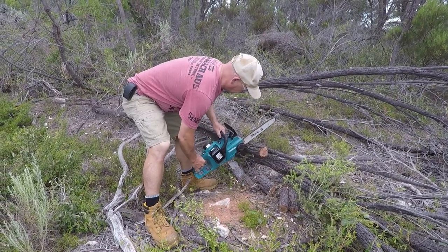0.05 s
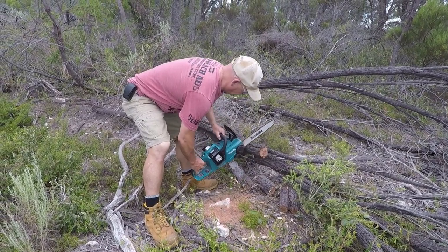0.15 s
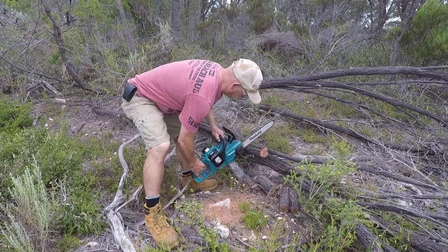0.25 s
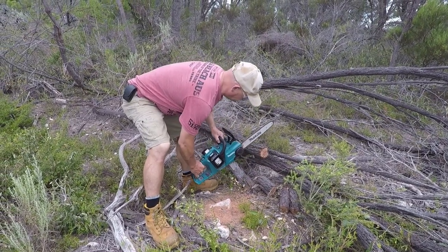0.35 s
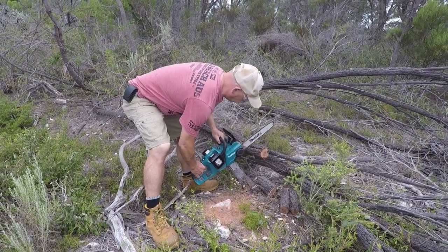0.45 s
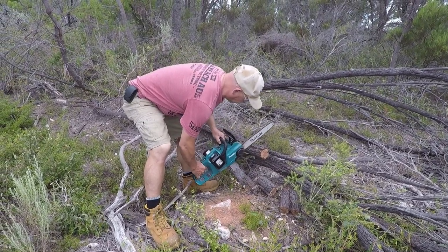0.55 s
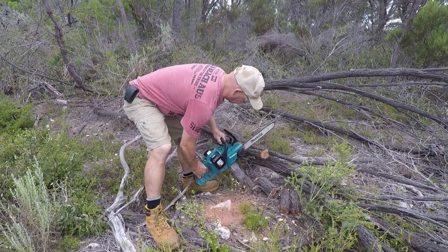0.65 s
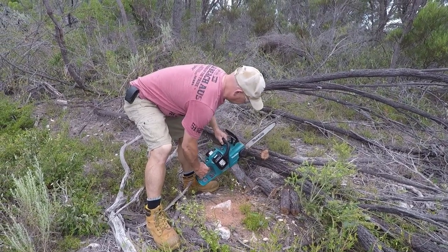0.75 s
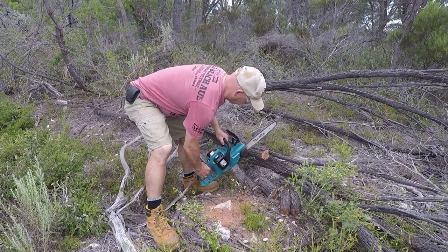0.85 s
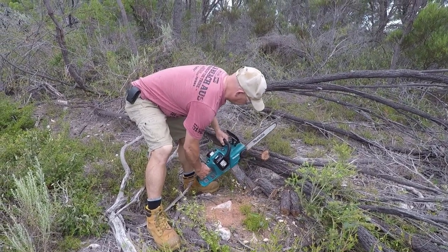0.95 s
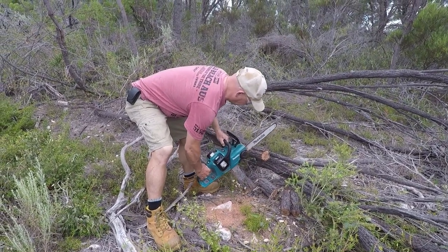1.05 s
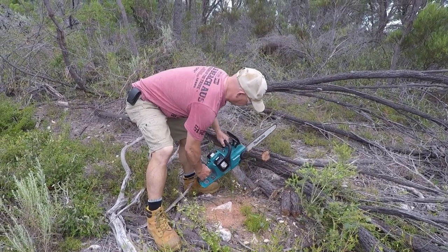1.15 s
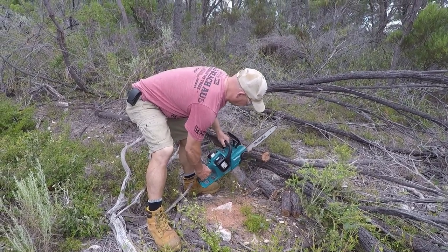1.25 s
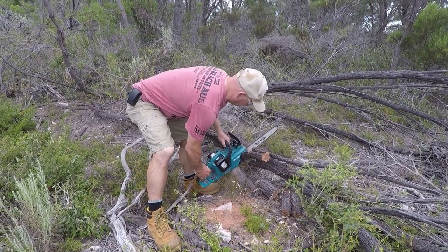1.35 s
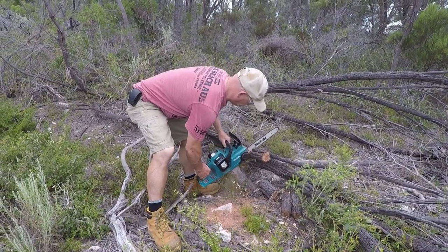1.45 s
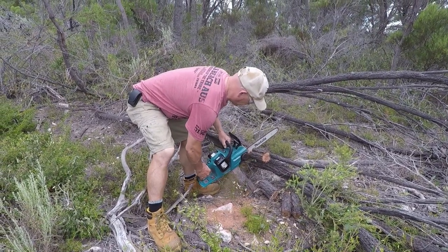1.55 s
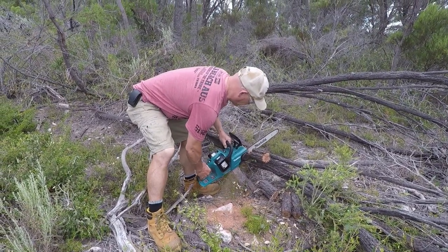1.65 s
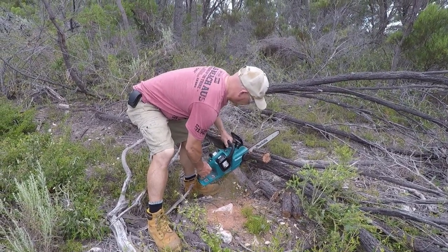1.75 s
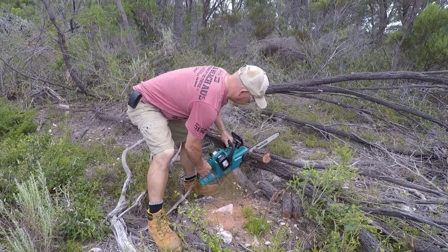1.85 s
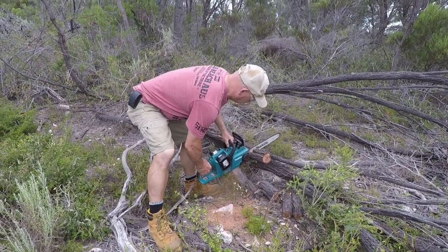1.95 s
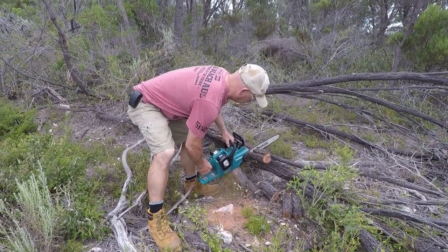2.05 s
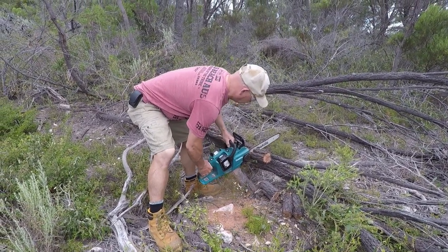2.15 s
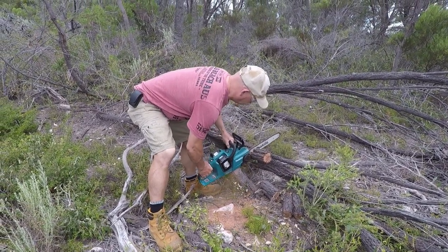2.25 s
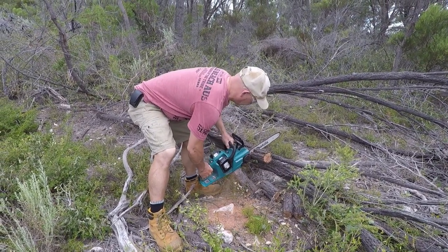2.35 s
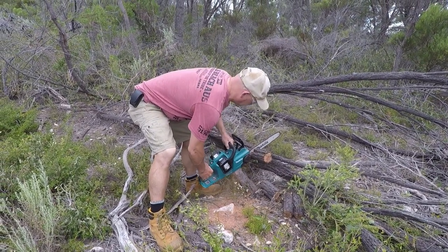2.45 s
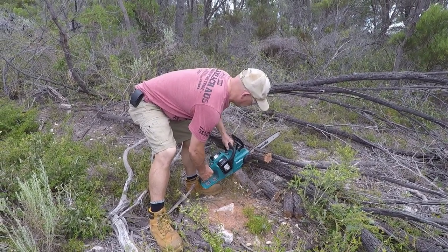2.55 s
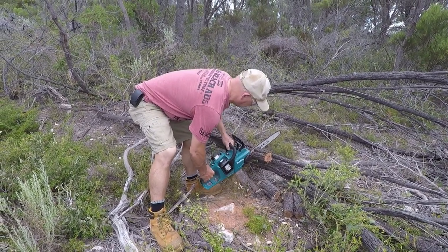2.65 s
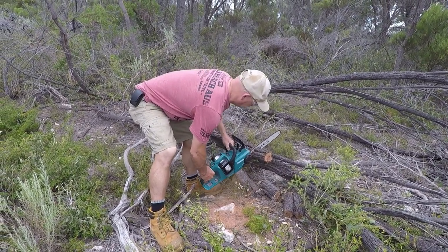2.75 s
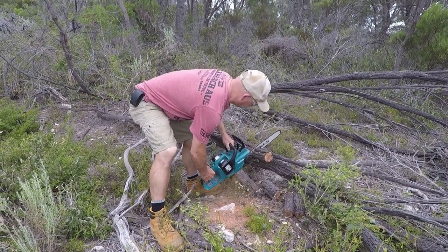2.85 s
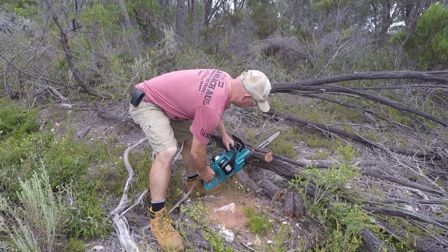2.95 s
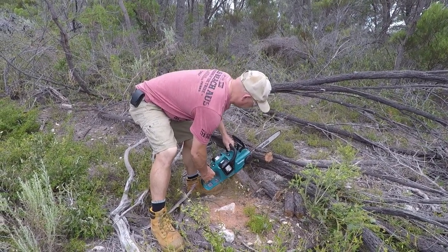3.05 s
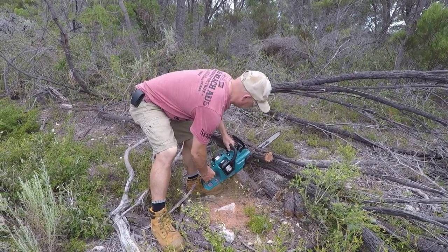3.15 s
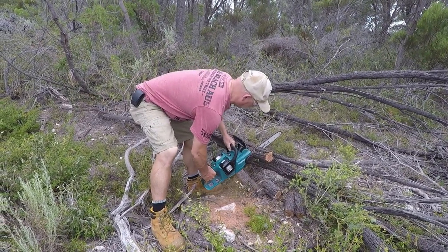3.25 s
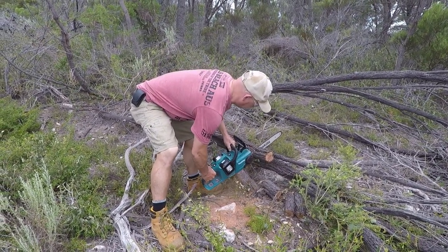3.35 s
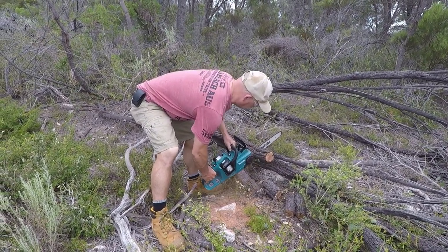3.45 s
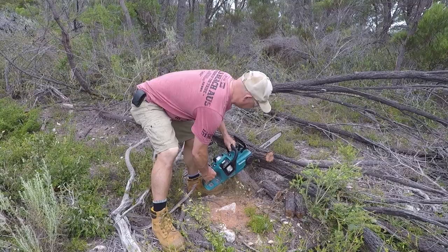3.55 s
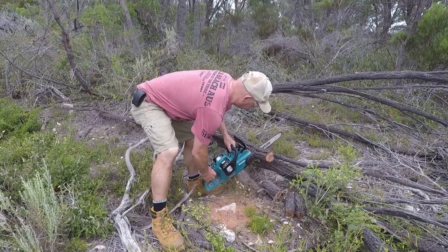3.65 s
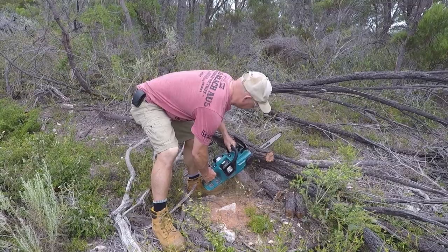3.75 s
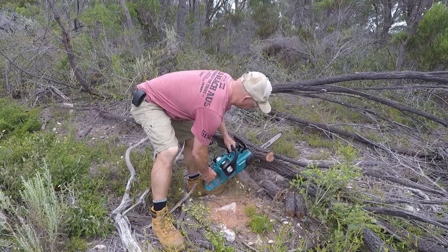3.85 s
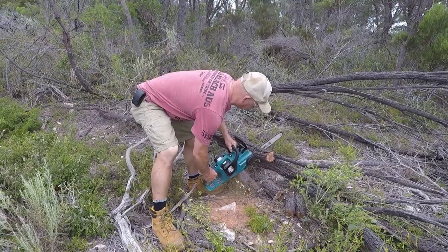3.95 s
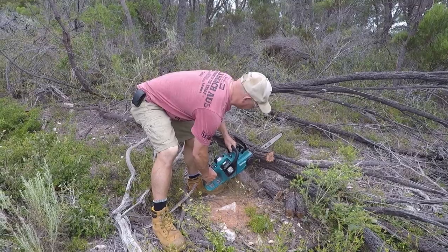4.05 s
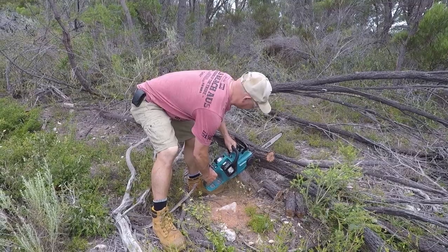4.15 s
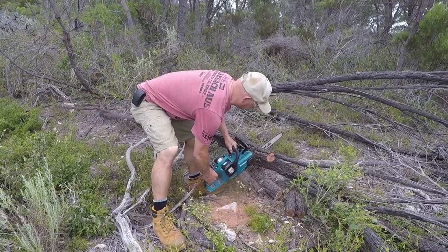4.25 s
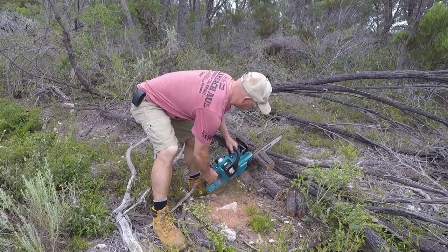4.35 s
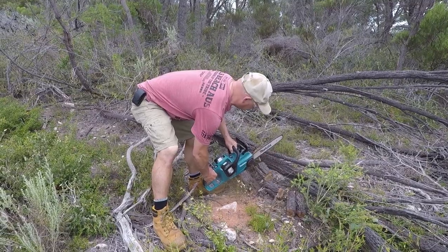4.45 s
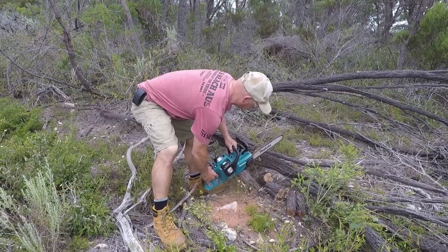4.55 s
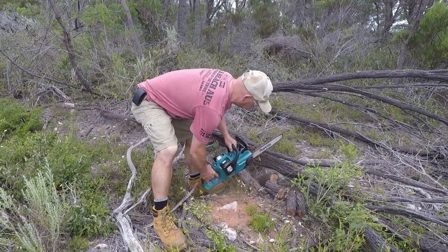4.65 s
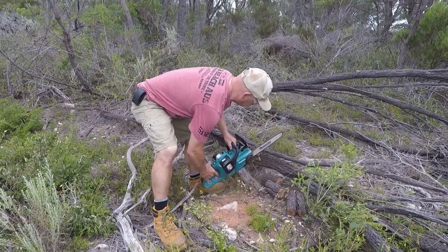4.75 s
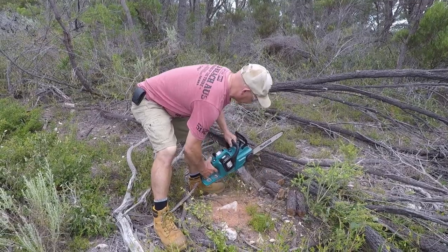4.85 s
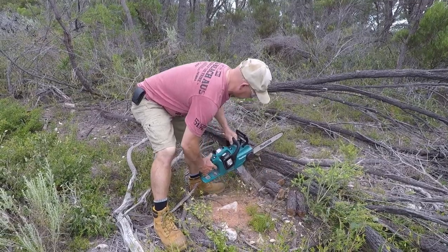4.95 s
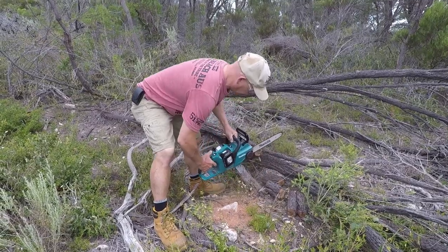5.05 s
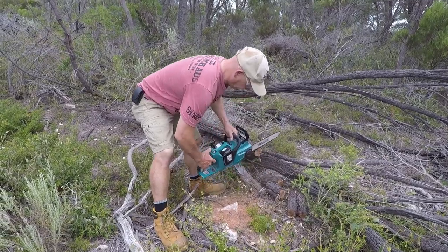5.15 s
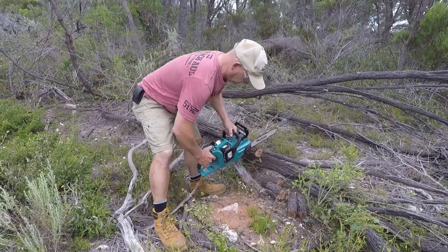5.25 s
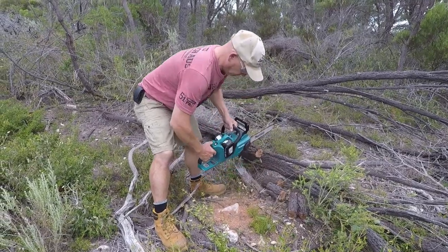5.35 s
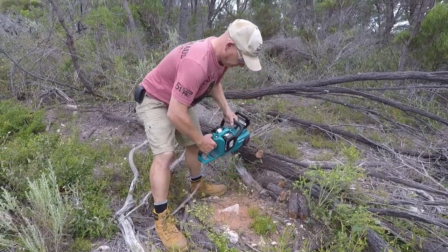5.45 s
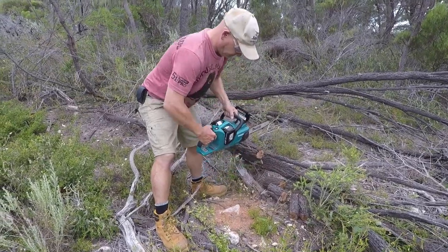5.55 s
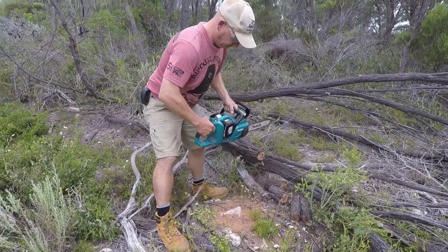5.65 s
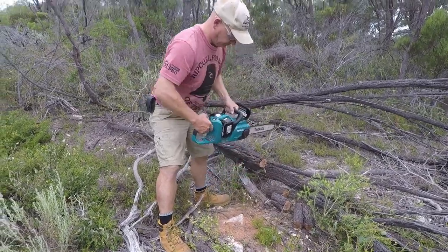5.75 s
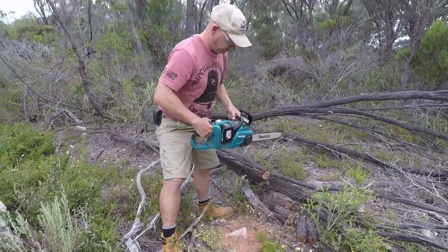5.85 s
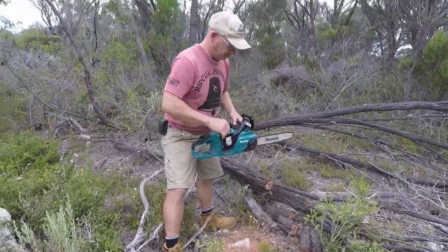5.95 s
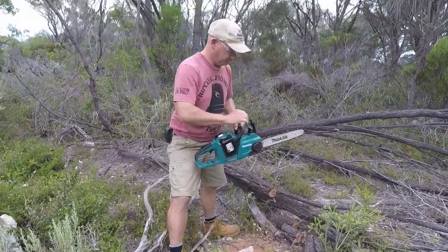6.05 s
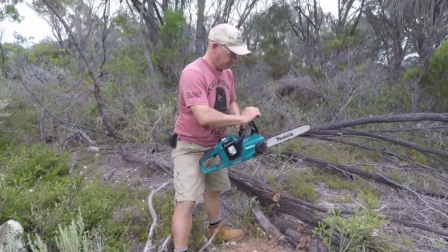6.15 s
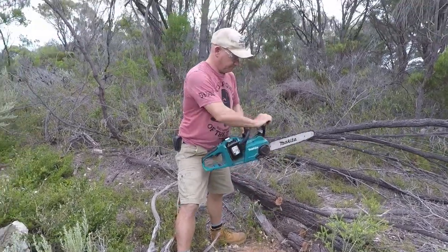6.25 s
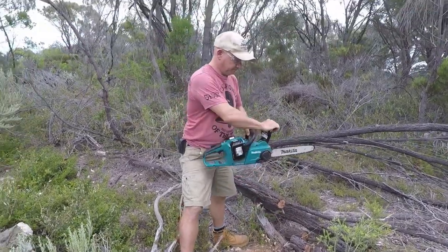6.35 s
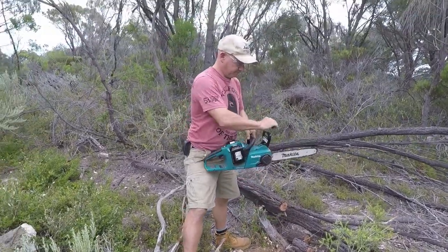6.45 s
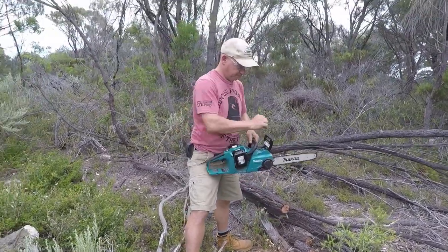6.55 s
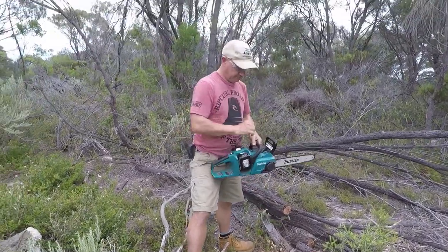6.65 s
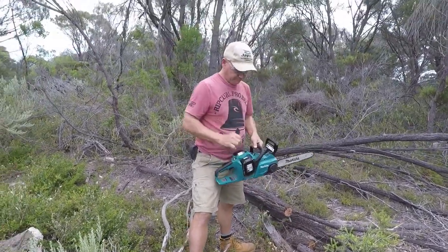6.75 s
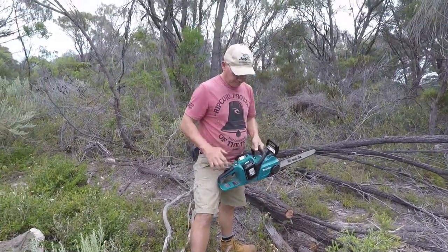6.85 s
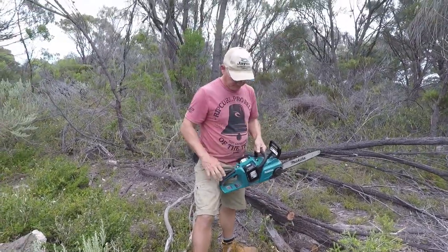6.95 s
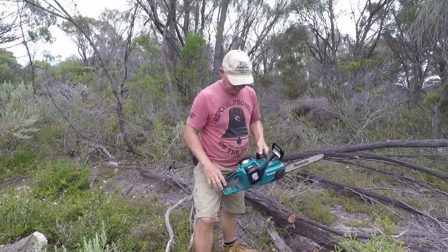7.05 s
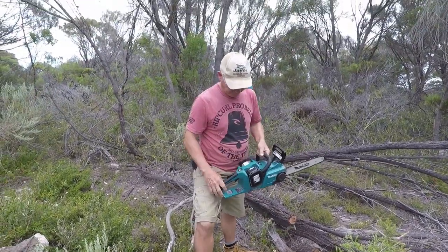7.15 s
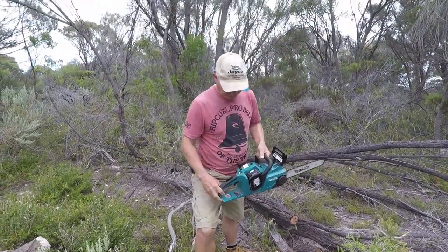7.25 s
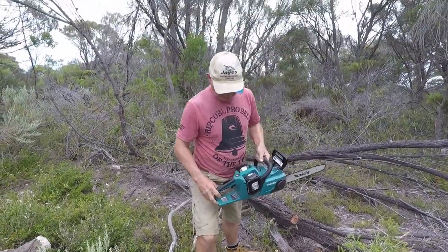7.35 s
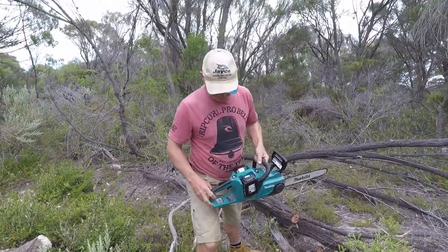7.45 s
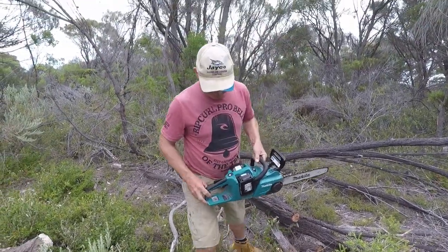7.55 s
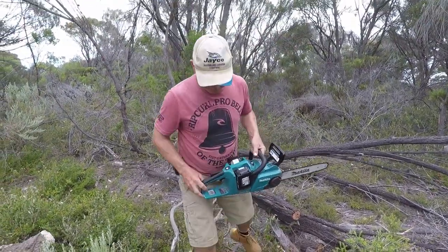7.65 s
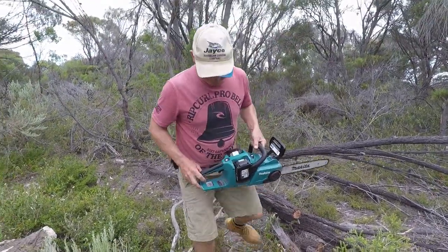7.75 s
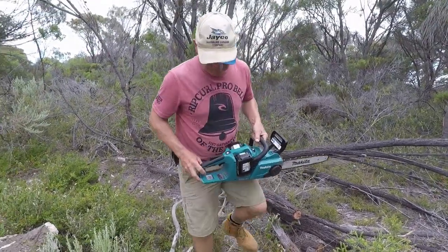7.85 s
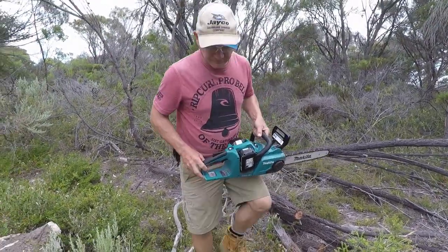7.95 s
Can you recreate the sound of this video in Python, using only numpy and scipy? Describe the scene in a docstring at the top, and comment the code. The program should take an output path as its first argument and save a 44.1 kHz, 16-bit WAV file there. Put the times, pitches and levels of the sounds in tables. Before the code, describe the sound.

A battery chainsaw is already spinning at the start, its bright buzzing whine rising for the first half second over a dry rasp. At about 0.75 s the chain bites the branch with rough skids, knocks and brief squeals; the bar chatters until 1.25 s. The pitch sags, lowest and most laboured around 1.7 to 2.1 s, then recovers with smaller dips near 2.7 and 3.3 s, climbing steadily towards 4.5 s. The trigger is released and a falling, resonant whine coasts to a stop by about 5.2 s. Quiet outdoor air remains. Low soft microphone bumps, mainly right, come from 5.5 to 6.3 s, with faint handling knocks near 5.9 s and a tiny bird chirp near 6.17 s. At 6.23 s the chain brake snaps sharply and rattles, with a short scattered tail. From 6.7 s boots crunch litter, brush scrub and crack twigs, strongest around 7.0 and 7.5 s; another soft bump lands at 7.7 s.

```python
"""A battery chainsaw cuts a fallen branch in open scrub, sags under load, and coasts to a stop.
Tones locked to the chain whine over noise that each passing link modulates: the rasp and the knock.
Then the chain brake snaps as decaying noise, and boots stir crackling litter and crack dry twigs.
Soft bumps ring a low resonance on the right of the microphone; air, a bird and faint ringing lie behind."""
import sys
import numpy as np
from scipy import signal
from scipy.fft import rfft, irfft, next_fast_len
from scipy.io import wavfile
from scipy.ndimage import uniform_filter1d

SR = 44100
rng = np.random.default_rng(int(sys.argv[2]) if len(sys.argv) > 2 else 0)


def inscribe(sig):
    """Save sig as 16-bit PCM at rate SR to the path in sys.argv[1].

    A 1-D sig is mono; a 2-D sig holds one channel per row.
    Samples are clipped to [-1, 1] before scaling.
    """
    pcm = np.round(np.clip(np.atleast_2d(sig).T, -1, 1) * 32767)
    wavfile.write(sys.argv[1], SR, pcm.astype(np.int16))


N = 352794
TIME = np.arange(N) / SR
BITE_S = 0.75   # the cutters sink into the wood
RELEASE_S, COAST_S = 4.505, 0.67   # the trigger is let go; time from there to a stop
FREE_HZ = 547.4   # cutters passing per second with no load


def from_db(db):
    """Decibels to gain: twenty decibels are a factor of ten in pressure."""
    return 10 ** (np.asarray(db) / 20)


def rms_one(x):
    """Scale to unit power, the mean square of the pressure."""
    return x / np.sqrt(np.mean(x ** 2) + 1e-20)


def in_time(rows):
    """Linear interpolation of each column of a curve at every sample."""
    s, *columns = np.transpose(rows)
    return [np.interp(TIME, s, c) for c in columns]


def span(start, end, fade=0.014):
    """Amplitude gate whose linear ramps avoid clicks."""
    return np.clip((TIME - start) / fade, 0, 1) * np.clip((end - TIME) / fade, 0, 1)


def drift(rate):
    """Band-limited chance of unit power, with this many new values a second."""
    knots = rng.standard_normal(8192)
    return rms_one(np.interp(TIME * rate, np.arange(len(knots)), knots))


def gain_at(points, hz):
    """Frequency response of a spectrum table, interpolated on a log-frequency axis."""
    f, db = np.transpose(points)
    return from_db(np.interp(np.log(hz + 1e-3), np.log(f), db))


def colour(x, spectrum, size=8192):
    """Causal minimum-phase filtering, from the folded cepstrum; it keeps the power of white noise."""
    hz = np.arange(size // 2 + 1) * SR / size + 1
    low_skirt = 1 / (1 + (spectrum[0][0] / hz) ** 4)
    high_skirt = 1 / (1 + (hz / spectrum[-1][0]) ** 8)
    cepstrum = irfft(np.log(gain_at(spectrum, hz) * low_skirt * high_skirt + 1e-6))
    cepstrum[1:size // 2] *= 2
    cepstrum[size // 2 + 1:] = 0
    response = irfft(np.exp(rfft(cepstrum)))
    response /= np.linalg.norm(response)
    return signal.fftconvolve(np.atleast_2d(x), response[None], axes=1)[:, :N]


def resonate(x, hz, width_hz):
    """Damped resonance as a two-pole filter, with gain 1 at its peak."""
    r = np.exp(-np.pi * width_hz / SR)
    zeros = np.array([1, 0, -1]) * (1 - r * r) / 2
    poles = [1, -2 * r * np.cos(2 * np.pi * hz / SR), r * r]
    return signal.lfilter(zeros, poles, x)


def bursts(events, t60):
    """Exponential decay: blows start at once and fall by 60 dB in t60 seconds."""
    kicks = np.zeros(N)
    for s, db in events:
        kicks[int(s * SR)] += from_db(db)
    return signal.lfilter([1], [1, -from_db(-60 / (t60 * SR))], kicks + 1e-18)


def bump(s, half_s):
    """Gaussian rise and fall about a peak time."""
    return np.exp(-((TIME - s) / half_s) ** 2)


def white():
    """Two uncorrelated noises of flat spectrum."""
    return rng.standard_normal((2, N))


def ports(direct, second, diffuse=0.29):
    """Stereo width by frequency: the side is the direct sound shifted in phase plus a second sound."""
    # side relative to mid, almost no width near 4.2 kHz: hz, level_db
    width = [(100, -26), (250, -34), (550, -33), (1000, -10), (1600, -6.5), (2700, -14.5), (3600, -19.5),
             (4200, -45), (5200, -9.5), (6500, -8.5), (7400, -1.5), (8400, 5.5), (10800, 1), (12400, -26),
             (14000, -3)]
    # left relative to right: hz, level_db
    balance = [(200, 0), (700, -3), (950, -5), (1900, 0.4), (3000, -1), (5000, 0.5), (5550, -4.5),
               (6100, 4.5), (7200, 5), (8300, 2), (9100, -11), (10700, -6), (11400, -1), (15000, 1.5)]
    size = next_fast_len(N + 4096)
    hz = np.arange(size // 2 + 1) * SR / size
    mid, share = rfft(direct, size), np.clip(diffuse, 0, 1)
    shifted = 1j * np.sqrt(1 - share) * mid   # a quarter period
    side = gain_at(width, hz) * (shifted + np.sqrt(share) * rfft(second, size))
    lean = np.sqrt(gain_at(balance, hz))
    return irfft(np.array([(mid + side) * lean, (mid - side) / lean]), size)[:, :N]


def bush():
    """Broadband air noise in mid and side, a frequency-gliding bird call and narrow-band ringing."""
    # air in the trees, common to the ports: hz, density_db (per Hz)
    air_mid = [(25, -32), (100, -31), (170, -18.5), (300, -20), (550, -20.5), (750, -29), (1100, -29.5),
               (1800, -33.5), (3500, -37), (4500, -39.5), (6300, -37), (8500, -40), (12400, -44.5),
               (15000, -55)]
    # air in the trees, difference between the ports: hz, density_db (per Hz)
    air_side = [(25, -33), (100, -40), (170, -34), (300, -23), (600, -17.5), (1400, -25.5), (3000, -39.5),
                (4300, -44), (6300, -38), (9000, -42), (12400, -46), (15000, -57)]
    # small bird's call: start_s, pitch_hz, relative_level_db
    bird = [(6.152, 5200, -85), (6.161, 5050, -56), (6.174, 4400, -61), (6.195, 4800, -59),
            (6.206, 4350, -85)]
    # faint steady ringing bands near 3.3 kHz: start_s, end_s, level_db
    rings = [(5.103, 5.55, -66), (7.65, 8.08, -62)]
    ring_hz, ring_width_hz = 3270, 220
    hz, chirp_db = in_time(bird)
    chirp = from_db(chirp_db - 2) * np.sin(2 * np.pi * np.cumsum(hz) / SR)
    chirp *= span(bird[0][0], bird[-1][0], fade=.003)
    ring_level = sum(from_db(db) * span(start, end, fade=0.1) for start, end, db in rings)
    band = resonate(resonate(white(), ring_hz, ring_width_hz), ring_hz, ring_width_hz)
    mid, side = white()
    common = from_db(-53.5) * colour(mid, air_mid)
    difference = from_db(-51) * colour(side, air_side) * [[1], [-1]]
    return common + difference + chirp + ring_level * rms_one(band)


def microphone_boom():
    """Impulsively excited resonance, also stirred by air: strong on the right, weak and inverted left."""
    # bumps on the microphone: start_s, relative_level_db
    bumps = [(5.494, -32), (5.559, -30.5), (5.705, -31.5), (5.933, -17), (5.974, -23.5), (6.055, -31),
             (6.106, -26.5), (6.142, -27), (6.187, -21.5), (6.234, -25), (6.287, -17), (6.328, -19),
             (7.666, -28), (7.691, -17.5), (7.832, -30.5), (7.912, -30.5)]
    boom_hz, boom_width_hz = 164.4, 43
    out = np.zeros(N)
    for s, db in bumps:
        first = int(s * SR)
        age = np.maximum(TIME[first:][:SR // 4] - s, 0)
        swell = age / 0.013   # the envelope peaks after 13 ms
        envelope = (swell * np.exp(1 - swell)) ** 2
        out[first:][:len(age)] += from_db(db + 2.5) * envelope * np.sin(2 * np.pi * boom_hz * age)
    stir = rms_one(resonate(resonate(white(), boom_hz, boom_width_hz), boom_hz, 107))
    right = out + from_db(-43.5) * stir[1]
    left = from_db(-52.0) * stir[0] - from_db(-26) * right
    return np.array([left, right])


def footsteps():
    """Granular friction and brittle fracture: boots scuff and crackle the litter, and twigs crack."""
    # boots press into the litter: peak_s, half_length_s, relative_level_db
    steps = [(6.726, 0.031, -65), (7.007, 0.077, -53), (7.473, 0.094, -49), (7.62, 0.04, -53),
             (7.99, 0.03, -64)]
    # twigs cracking: start_s, relative_level_db
    twig_cracks = [(6.711, -25), (6.932, -29.5), (6.961, -34), (7.033, -22.5), (7.237, -37), (7.307, -35),
                   (7.352, -35), (7.358, -26), (7.43, -35), (7.442, -27), (7.458, -32), (7.468, -25),
                   (7.474, -31), (7.596, -20), (7.99, -39)]
    # thicker sticks knock under the boots: start_s, pitch_hz, relative_level_db
    sticks = [(7.033, 835, -21), (7.307, 835, -20), (7.442, 1590, -17), (7.467, 880, -13),
              (7.525, 950, -29), (7.595, 700, -26)]
    # boots and legs brush through the scrub: peak_s, half_length_s, pitch_hz, relative_level_db
    scrub = [(5.42, 0.07, 5960, -63), (6.984, 0.025, 885, -54), (7.003, 0.011, 5240, -47),
             (7.1, 0.018, 1700, -59), (7.48, 0.045, 1400, -61), (7.481, 0.031, 6250, -45.5),
             (7.628, 0.011, 1900, -55)]
    # colour of litter and twigs: hz, relative_level_db
    twig_colour = [(180, -17), (300, 4.5), (416, -10), (647, 0), (1270, -17), (1570, -13), (2600, -14.5),
                   (6200, -5), (8600, -26), (13800, -42), (15000, -39)]
    walk_s, litter_db = 6.62, -59.5   # from here on the litter keeps stirring
    brush_width = 0.3   # first bandwidth as a share of the pitch
    pressure = sum(from_db(db) * bump(s, half_s) for s, half_s, db in steps)
    pressure = pressure + from_db(litter_db) * span(walk_s, 9)
    texture = rms_one(from_db(4.4 * np.minimum(drift(550), 1.7)))
    crackle = texture * pressure
    scuff = from_db(-8.5) * crackle * rms_one(resonate(white(), 1100, 1400))
    cracks = from_db(-9.5) * bursts(twig_cracks, t60=0.012)
    knocks = sum(resonate(white() * bursts([(s, db)], t60=0.017), hz, 250) for s, hz, db in sticks)
    leaves, brushes = white(), np.zeros((2, N))
    for s, half_s, hz, db in scrub:
        band = resonate(resonate(leaves, hz, brush_width * hz), hz, 2 * brush_width * hz)
        brushes += from_db(db) * bump(s, half_s) * rms_one(band)
    return ports(*(colour(white() * (crackle + cracks), twig_colour) + scuff + knocks + texture * brushes))


def handling():
    """Impact excitation of the plastic shell: soft knocks as the saw is lifted in the hands."""
    # knocks of the saw: start_s, relative_level_db
    lifts = [(5.882, -43), (5.976, -49)]
    # colour of the plastic shell: hz, density_db (per Hz)
    shell = [(250, -6), (600, 10), (1100, -3), (2200, -11), (3400, -5), (4600, -10), (6100, 0), (7500, -12),
             (10000, -26), (15000, -40)]
    return ports(*colour(white() * bursts(lifts, t60=0.069), shell))


def brake():
    """Impact and reverberation: the tripped brake snaps and rattles; the trees scatter a tail."""
    # chain brake contacts: start_s, relative_level_db
    contacts = [(6.2152, -31), (6.2278, -8), (6.2300, -31), (6.2340, -19.5), (6.2405, -20), (6.2492, -22.5),
                (6.2542, -27), (6.2602, -25)]
    # colour of the snap: hz, relative_level_db
    snap_colour = [(150, -2), (300, -5), (520, -8), (700, -15), (1050, -8.5), (1350, -9), (1600, -2),
                   (2000, -7), (3200, -10.5), (3700, -11), (6300, -11), (7500, -23), (10000, -35),
                   (15000, -40)]
    # colour of the scattered tail: hz, relative_level_db
    tail_colour = [(290, -39), (500, 0), (661, -6), (861, -10), (1080, -5), (1610, 2), (1780, -5),
                   (4280, -10), (5980, -1), (14000, -58)]
    snap = colour(white() * bursts(contacts, t60=0.026), snap_colour) * from_db(1.1)
    tail = colour(white() * bursts(contacts, t60=0.43), tail_colour) * from_db(-32.5)
    return ports(*(snap + tail))


def chain_speed():
    """Motor load line: load is read from the loss of speed; after release a power law runs it down."""
    # chain speed while the trigger is held: start_s, cutters_per_s
    speed = [(0.02, 464.7), (0.09, 496.9), (0.27, 532.4), (0.46, 537.2), (0.7, 533), (0.93, 522),
             (0.97, 507), (1.08, 504), (1.15, 499), (1.29, 467), (1.5, 471.5), (1.67, 452.4), (1.73, 392),
             (1.92, 383), (2.14, 404), (2.22, 454.7), (2.35, 480.3), (2.58, 488), (2.68, 455.3),
             (2.76, 462), (2.88, 490), (3.12, 494), (3.26, 471.5), (3.4, 503), (3.6, 513), (3.8, 515),
             (3.88, 508), (3.95, 486.3), (4.02, 503), (4.2, 517), (4.28, 514), (4.36, 524), (4.5, 528)]
    coast_power = .77   # speed falls as this power of the time left
    bogged_hz = 420   # cutter rate under full load
    held, = in_time(speed)
    left = np.clip(1 - (TIME - RELEASE_S) / COAST_S, .01, 1)
    load = np.clip((FREE_HZ - held) / (FREE_HZ - bogged_hz), 0, 1)
    return held * left ** coast_power, load


def follow(law, rate, load):
    """Power law of speed, in decibels, with a linear change under load."""
    free_db, slope, load_db = law
    return free_db + slope * 20 * np.log10(rate / FREE_HZ) + load_db * load


def shift_db():
    """Changing contact: as the bar runs free, skids or cuts, the layers change level in dB."""
    # free running at first, then a skid, later pinched or running freely:
    # start_s, end_s, rasp_db, knock_db, main_tones_db, overtones_db (changes)
    shifts = [(0.285, 0.732, 0.25, -0.5, 0.5, 3), (0.729, 0.882, -4, -4, -3.5, -6),
              (0.96, 1.246, -3, -1.5, -4, 3), (1.262, 1.5, -0.9, -0.7, 0, 0),
              (2.25, 2.75, 0.5, 0.5, -1, -1.5), (2.765, 3.417, 0, -1, -2.5, 0),
              (3.28, 3.387, -1.5, -2, 0, -2), (3.37, 3.547, -1.5, -2, -0.5, 2),
              (3.536, 3.91, -0.5, -0.5, 1, 1.5), (3.886, 4.36, -0.5, -1.7, 1.9, 1.5),
              (4.33, 4.76, 0, -1.5, -0.5, -9)]
    return sum(np.outer(changes, span(start, end, fade=0.039)) for start, end, *changes in shifts)


def chatter():
    """Amplitude modulation: the bar hops on the wood at a gliding rate; local power is evened out."""
    # bounces of the bar: start_s, end_s, first_per_s, last_per_s, relative_depth_db
    bounces = [(0.7335, 0.825, 60, 60, 4.5), (1.004, 1.235, 62.5, 70, 3.2), (1.785, 2.11, 85.5, 70, 3.4),
               (2.35, 2.68, 60, 68, 1.1), (2.752, 2.95, 64, 62, 2), (2.978, 3.3, 65, 80, 2.6)]
    hop_db = np.zeros(N)
    for start, end, first_per_s, last_per_s, depth_db in bounces:
        rate = np.interp(TIME, [start, end], [first_per_s, last_per_s])
        angle = 2 * np.pi * np.cumsum(rate * (TIME > start)) / SR
        hop_db += depth_db * span(start, end, fade=0.03) * (np.cos(angle) + .3 * np.cos(2 * angle))
    gain = from_db(hop_db * (1 + 0.17 * drift(39.77)))
    return gain / np.sqrt(uniform_filter1d(gain ** 2, size=2048))


def jolts():
    """Impulsive modulation: hard knocks of the hopping bar and many light random snaps spike the rasp."""
    # hard knocks of the hopping bar: start_s, level_db (re the running rasp)
    hard = [(0.7465, -1), (0.7505, 2), (0.7655, -10), (0.8, -3), (0.871, 7), (1.002, 2), (1.016, -2),
            (1.066, -4), (1.119, 3), (1.186, -7), (1.240, 4)]
    snaps_per_s, snap_db = 45, -3   # light ones, with the strongest level re the running rasp
    draws = rng.random((int(snaps_per_s * RELEASE_S), 2))
    light = [(RELEASE_S * when, snap_db - 8 * size) for when, size in draws]
    return 1 + bursts([*hard, *light], t60=.009)


def chain_grain(cutters, uneven_db, chance_db, pulsing):
    """Cyclic modulation: links strike in turn, each with a strength kept every lap, plus chance."""
    link_count = 52
    links = 2 * cutters
    number = links.astype(int)
    strength = uneven_db * rng.standard_normal(link_count)[number % link_count]
    strength += chance_db * rng.standard_normal(8192)[number]
    beat = 1 + pulsing * (np.cos(2 * np.pi * cutters) + 0.52 * np.cos(2 * np.pi * links))
    return rms_one(from_db(strength) * beat)


def squeals(hops):
    """Resonant excitation: the hops of the pinched bar drive one of its resonances with noise."""
    # squeals of the pinched bar: start_s, end_s, pitch_hz, width_hz, relative_level_db
    pinches = [(0.735, 0.817, 6050, 650, -27.5), (1.02, 1.21, 5170, 90, -29.5)]
    out = np.zeros(N)
    for start, end, hz, width_hz, db in pinches:
        band = resonate(resonate(rng.standard_normal(N), hz, width_hz), hz, width_hz)
        out += from_db(db) * span(start, end) * rms_one(band)
    return out * hops ** 2


def kerf():
    """Noise-modulated carriers: hoarse bands swell and sink, and climb as the cut deepens."""
    # bands of the cut: pitch_hz (at the bite), rise_hz_per_s, width_hz, level_db (before the swell)
    bands = [(2958, 165, 430, -32.5), (5494, 200, 520, -32)]
    swell_spread_db = -1.5
    out = np.zeros(N)
    for start_hz, rise, width_hz, db in bands:
        hz = start_hz + rise * (TIME - BITE_S)
        noise = drift(width_hz) + 1j * drift(width_hz)
        band = noise * np.exp(2j * np.pi * np.cumsum(hz) / SR)
        out += from_db(db + swell_spread_db * drift(9)) * band.real
    return out * span(BITE_S, RELEASE_S + 0.49, fade=0.22)


def chips():
    """Damped free vibration: each torn chip leaves chain and bar ringing at a pitch of its own."""
    chips_per_s, chip_t60_s, spread_db = 260, .055, 3.5
    low_hz, high_hz, held_rms_db = 1400, 6703, -28.5   # level while the trigger is held
    out, age = np.zeros(N), np.arange(int(chip_t60_s * SR)) / SR
    for when, pitch, size, phase in rng.random((int(chips_per_s * RELEASE_S), 4)):
        hz = low_hz + pitch * (high_hz - low_hz)
        db = spread_db * min(-np.log(1 - size), 3) - 60 * age / chip_t60_s
        ring = from_db(db) * np.sin(2 * np.pi * (hz * age + phase))
        out[int(when * RELEASE_S * SR):][:len(age)] += ring
    return from_db(held_rms_db) * out / np.std(out[TIME < RELEASE_S])


def tone(cutters, multiple, rough):
    """Phase-locked harmonic of unit power, wavering as the cutters bite unevenly."""
    waver = (1 + rough * (drift(90) + 1j * drift(90))) / np.sqrt(.5 + rough ** 2)
    return np.real(waver * np.exp(2j * np.pi * (multiple * cutters + rng.random())))


def swell_db(multiple, hz):
    """Resonance crossing: a tone is lifted as its pitch sweeps through a resonance of its part."""
    # resonances of the sounding parts: multiple (of the cutter rate), centre_hz, half_width_hz, lift_db
    swells = [(1, 477, 106, 20), (2, 940, 20, 4), (2, 1072, 30, 5.5), (4, 1535, 110, 8.5), (7, 3570, 68, 0),
              (10, 5080, 320, 13)]
    return sum(db * np.exp(-((hz - centre) / width) ** 2)
               for k, centre, width, db in swells if k == multiple)


def singing(multiple):
    """Selective excitation: the height of one tone that sings out as the bar leans in the cut."""
    # tones that sing out: start_s, end_s, multiple (of the cutter rate), relative_level_db
    songs = [(0.74, 0.98, 10, -34), (0.925, 1.1, 6, -28.5), (0.92, 1.09, 8, -33), (1.0, 1.18, 5, -32),
             (1.2, 1.6, 6, -34), (1.5, 1.75, 2, -33), (1.77, 2.05, 4, -28), (2.1, 2.72, 2, -32),
             (2.11, 2.65, 5, -33), (2.12, 2.702, 4, -31.5), (2.268, 2.57, 3, -32), (2.839, 3.218, 3, -31),
             (3.08, 3.29, 5, -31), (3.506, 3.88, 9, -35), (3.64, 3.87, 8, -30), (3.67, 3.87, 12, -32),
             (3.92, 4.52, 7, -29), (4.11, 4.42, 6, -35), (4.12, 4.34, 11, -35)]
    return sum(from_db(db) * span(start, end, fade=.08) for start, end, k, db in songs if k == multiple)


def whine(cutters, rate, load, hops, biting, coasting, main_db, ringing_db):
    """Harmonic series of chain and rotor, shaped by resonances; its tones fade after release."""
    # main tones (cutters, drive links, their harmonics, motor): multiple (of the cutter rate),
    # relative_level_db, free_db (added before the bite), coast_db (added when coasting), roughness (0-1)
    main_tones = [(1, -46.5, 0, -6, 0.07), (2, -37.5, 3.5, 1, 0.19), (3, -43.5, 7.5, -9, 0.54),
                  (4, -39.5, 4.5, -18, 0.36), (10, -45.5, 8.5, -2, 0)]
    # rotor unbalance: multiple (of the rotor rate), level_db (re the hum), free_db (added before the bite)
    rotor = [(1, 0.5, 1.5), (2, -11, 6), (4, -8, -2.5), (5, -13, 10)]
    # chain overtones: multiple (of the cutter rate), relative_level_db
    overtones = [(5, 0.5), (6, 1.5), (7, 0.5), (8, -2), (9, 0), (11, -3), (12, -7.5), (13, -9), (14, -4)]
    # resonances of housing and bar that shape the overtones: hz, lift_db
    housing = [(500, -12), (1000, 5), (1750, 6), (2150, -1.5), (2450, 3), (2700, 0), (3100, 3), (3600, 2),
               (4200, 5.5), (5200, -1), (6200, 8.5), (7500, -3)]
    # hum: level_db (at free speed), slope (dB per dB of speed), load_db (added at full load)
    hum_law = (-38, 5, 1.5)
    cutter_free_db = -32   # cutter tone before they sink in, ahead of the free_db and shift changes
    rundown_slope = 1.04   # dB that the coasting tones lose per dB of speed, besides coast_db
    out = np.zeros(N)
    for multiple, db, free_db, coast_db, rough in main_tones:
        level_db = db + coast_db * coasting + swell_db(multiple, multiple * rate)
        if multiple == 1:   # the branch resonates only once the cutters are in it
            level_db = biting * level_db + (1 - biting) * cutter_free_db
        height = from_db(level_db + free_db * (1 - biting) + main_db)
        out += np.hypot(height, singing(multiple)) * tone(cutters, multiple, rough)
    hum_db = follow(hum_law, rate, load)
    for multiple, db, free_db in rotor:
        height = from_db(hum_db + db + free_db * (1 - biting))
        out += height * tone(cutters, multiple / 3, rough=0.067)   # three cutters pass per rotor turn
    for multiple, db in overtones:
        level_db = -39.5 + db - 2 * load + ringing_db + swell_db(multiple, multiple * rate)
        height = gain_at(housing, multiple * rate) * from_db(level_db + 1.6 * drift(6))
        out += hops * np.hypot(height, singing(multiple)) * tone(cutters, multiple, rough=.4)
    return out * (rate / FREE_HZ) ** (rundown_slope * coasting)


def rundown(cutters, rate):
    """Swept source and fixed resonator: falling tones of the coasting drive cross the casing's modes."""
    # tones of the coasting drive: multiple (of the cutter rate), relative_level_db, roughness (0-1)
    drive_tones = [(2, -3, 0.08), (3, -12, 0.4), (4, 0.5, 0.1), (5, -9, 0.6), (6, -6.5, 0.55),
                   (7, -12, 0.7), (8, -11, 0.7), (10, -11, 0.7)]
    # resonances of the casing round the drive: hz, relative_level_db
    casing = [(300, -54), (400, -33), (560, -29), (800, -30), (960, -29), (1120, -26), (1250, -22.5),
              (1370, -20), (1500, -35), (1620, -25), (1750, -26), (1890, -22), (2100, -37), (2350, -35),
              (2520, -26), (2750, -34), (3200, -23), (3700, -30), (5000, -46)]
    out = np.zeros(N)
    for multiple, db, rough in drive_tones:
        out += from_db(db) * gain_at(casing, multiple * rate) * tone(cutters, multiple, rough)
    return from_db(-4.0) * out


def saw():
    """Periodic and random excitation: chain tones, rasp and knock all follow the chain speed."""
    # rasp in the wood: hz, density_db (per Hz)
    rasp_colour = [(1180, -31.5), (2000, -3.5), (2210, -6.5), (2690, -4.5), (3100, 0.5), (3520, -0.5),
                   (3860, -2.5), (4850, -4), (6030, -1.25), (7080, -4.5), (8310, -17.5), (9050, -17),
                   (10900, -20), (13300, -13), (15000, -26.5)]
    # rasp before the bite: hz, density_db (per Hz)
    free_colour = [(1180, -35), (2000, -5), (2310, -16.5), (2760, -3.5), (3320, -3.5), (4030, -6),
                   (5190, -3.5), (5590, -6.5), (6680, -4), (7710, -12), (8240, -21), (9200, -16.5),
                   (11000, -22.5), (13400, -15), (15000, -29)]
    # knock of bar and branch: hz, density_db (per Hz)
    knock_colour = [(330, -37.5), (560, -8.5), (723, -8), (999, 3), (1260, 2), (1500, 1.5), (1840, 4),
                    (2200, -7), (2400, -9.5), (3120, -24.5), (5280, -120)]
    # low thud of the wood: hz, density_db (per Hz)
    wood_colour = [(60, -36.5), (120, -44), (170, -16), (270, -16.5), (350, -4), (450, 6.5), (560, 2),
                   (700, -8.5), (1000, -45)]
    # how rasp and knock follow the chain: relative_level_db (at free speed), slope (dB per dB of speed),
    # load_db (added at full load)
    rasp_law = (-18, 0.66, 1)
    knock_law = (-26.5, 0.039, 4.2)
    wood_free_db, wood_slope = -2.5, -0.14   # thud: weaker before the bite, gains as the chain slows
    rate, load = chain_speed()
    biting = span(BITE_S, 9, fade=0.055)
    coasting = span(RELEASE_S + 0.015, 9, fade=0.061)
    rasp_shift_db, knock_shift_db, main_db, ringing_db = shift_db()
    rasp_db = follow(rasp_law, rate, load) + rasp_shift_db
    knock_db = follow(knock_law, rate, load) + knock_shift_db + 0.73 * drift(14)
    # the running count of cutters, with a slight jitter of speed, is the phase of every tone
    cutters = np.cumsum(rate * (1 + (0.00117 + 0.0027 * coasting) * drift(45))) / SR
    hops = chatter()
    grain = chain_grain(cutters, uneven_db=0.46, chance_db=0.54, pulsing=0.13)
    grain = grain * from_db((.5 + 0.2 * load) * drift(27.92)) * hops * jolts()
    rasp = colour(np.sqrt(biting) * grain * white(), rasp_colour)
    rasp += colour(np.sqrt(1 - biting) * grain * white(), free_colour)
    noise = from_db(rasp_db - 2.0) * rasp
    noise += from_db(knock_db - 2.0) * colour(grain * white(), knock_colour)
    thud = from_db(knock_db - 12 + wood_free_db * (1 - biting)) * (rate / FREE_HZ) ** wood_slope
    noise += thud * colour(grain * white(), wood_colour)
    direct = noise[0] + whine(cutters, rate, load, hops, biting, coasting, main_db, ringing_db)
    direct += squeals(hops) + hops * kerf()
    direct += hops * from_db(rasp_shift_db) * chips()
    moving = span(-1, RELEASE_S + COAST_S, fade=.14) ** 1.78   # silent once the chain stands
    coast = coasting * moving ** 0.73 * rundown(cutters, rate)
    return ports(moving * direct + coast, moving * noise[1])


def scene():
    """Superposition at the microphone; a high-pass takes the deep bass from the near sounds."""
    near = microphone_boom() + footsteps() + handling() + brake() + saw()
    rumble_cut = signal.butter(5, 149, "high", fs=SR, output="sos")
    return bush() + signal.sosfilt(rumble_cut, near)


def record(dry):
    """Clipping at full scale, then a steep low-pass that cuts the top."""
    top_cut = signal.ellip(10, .1, 80, 15300, fs=SR, output="sos")
    return signal.sosfilt(top_cut, np.clip(dry, -1, 1))


dry = scene()
out = record(dry)
inscribe(out)
```